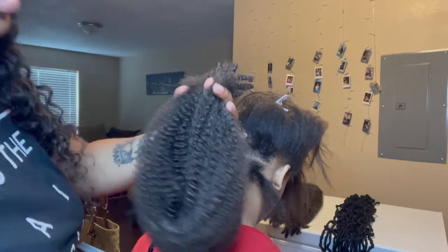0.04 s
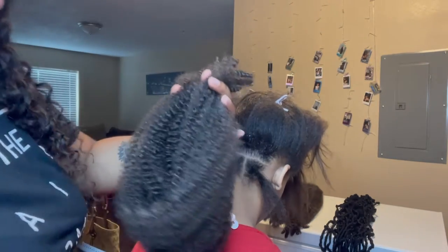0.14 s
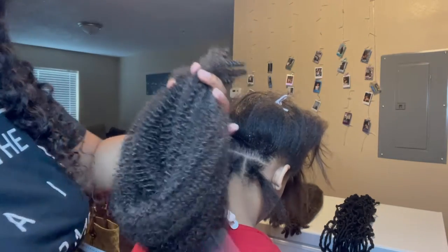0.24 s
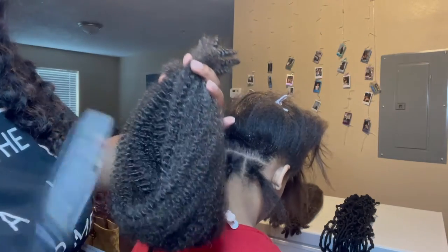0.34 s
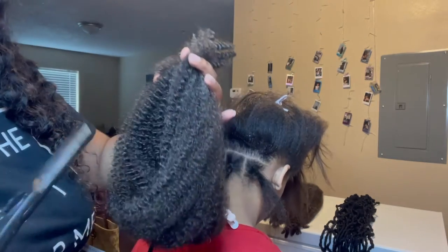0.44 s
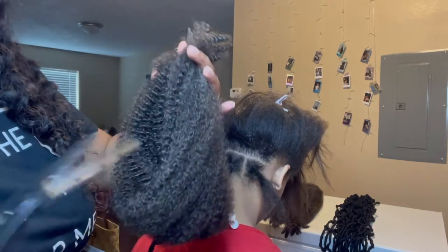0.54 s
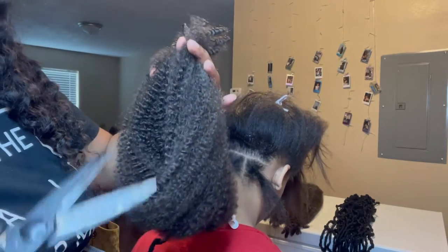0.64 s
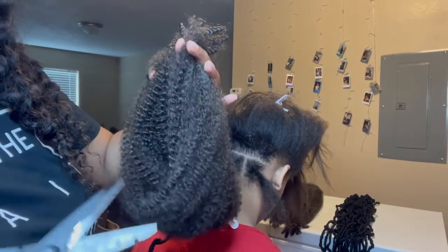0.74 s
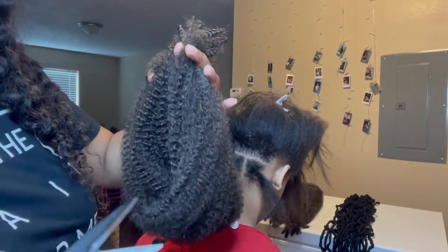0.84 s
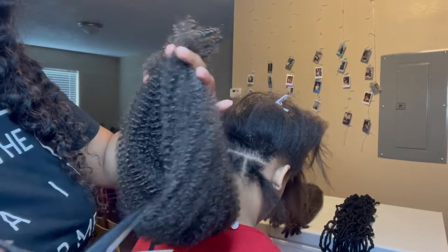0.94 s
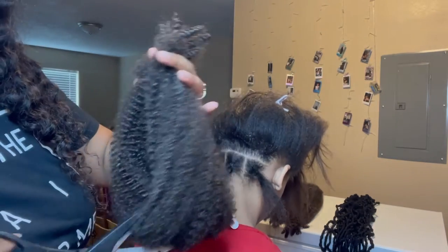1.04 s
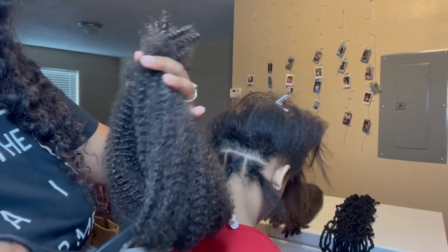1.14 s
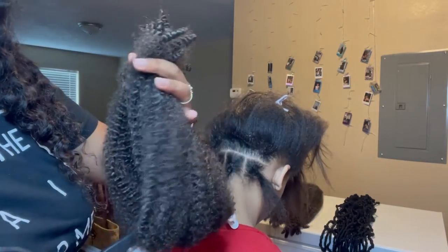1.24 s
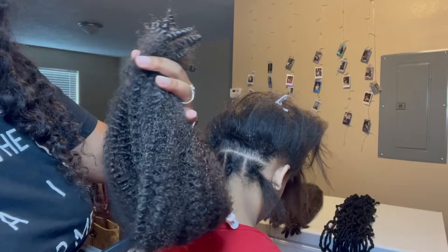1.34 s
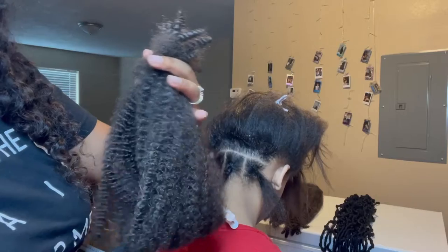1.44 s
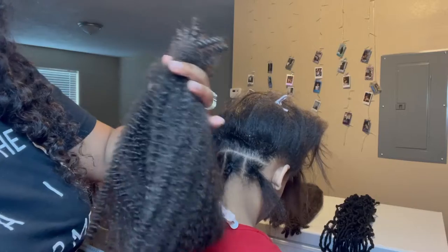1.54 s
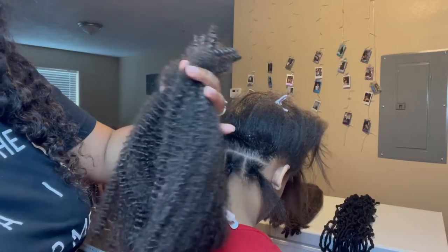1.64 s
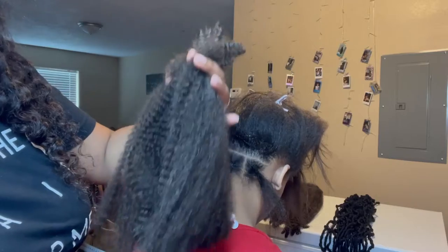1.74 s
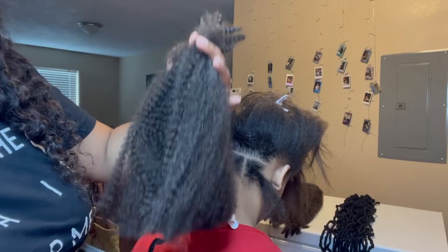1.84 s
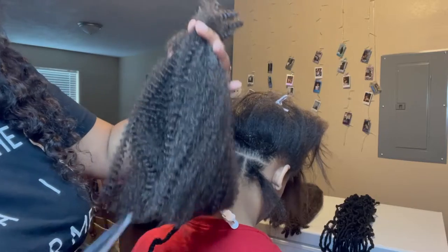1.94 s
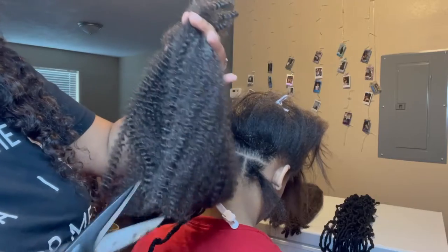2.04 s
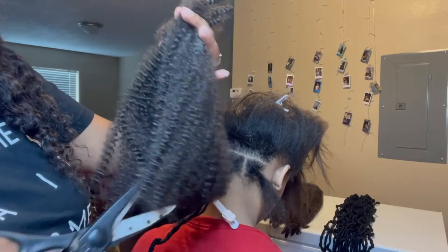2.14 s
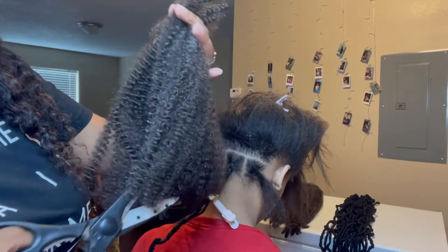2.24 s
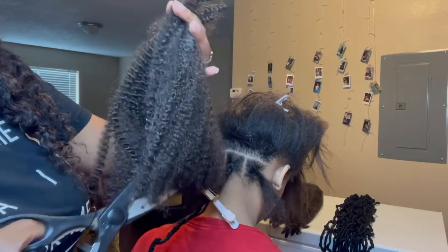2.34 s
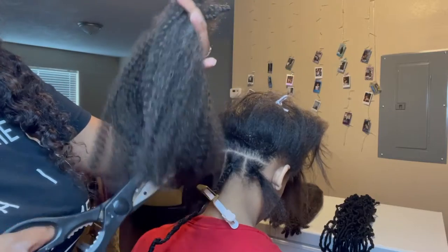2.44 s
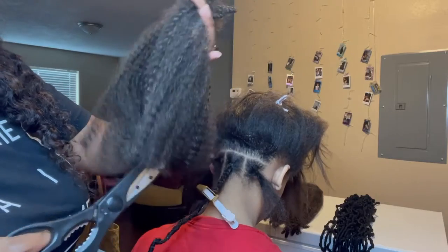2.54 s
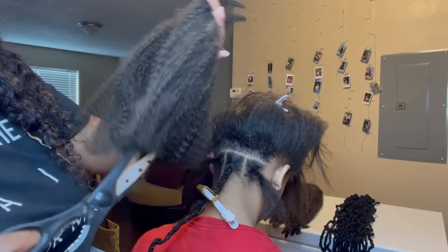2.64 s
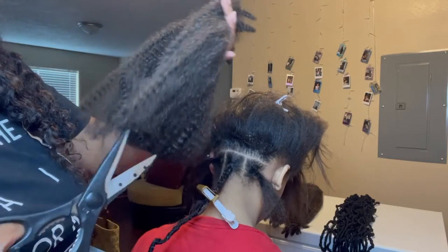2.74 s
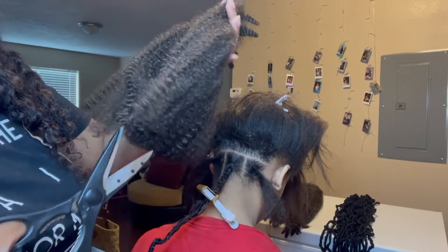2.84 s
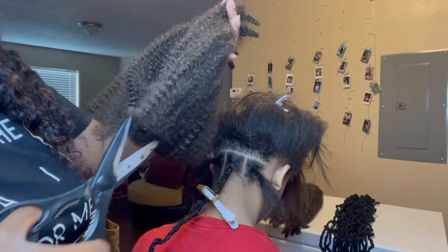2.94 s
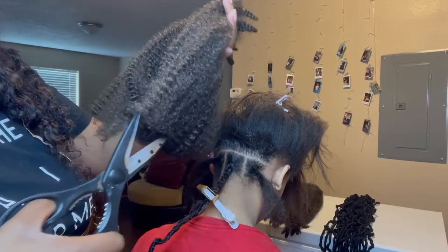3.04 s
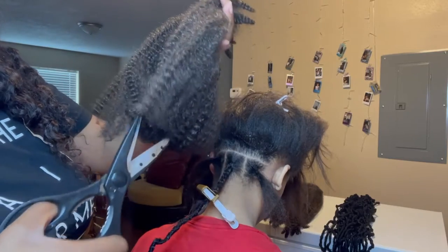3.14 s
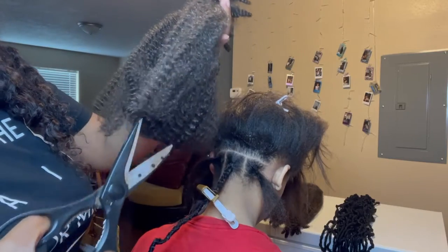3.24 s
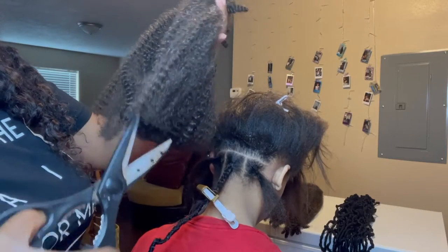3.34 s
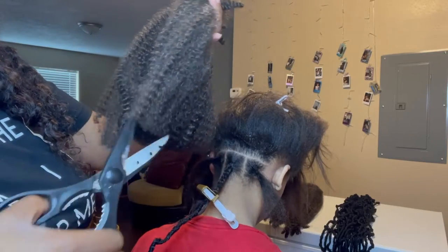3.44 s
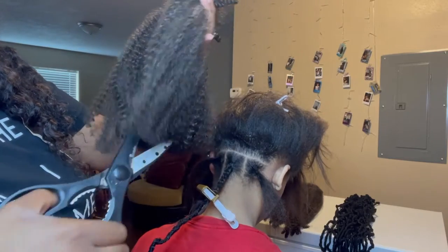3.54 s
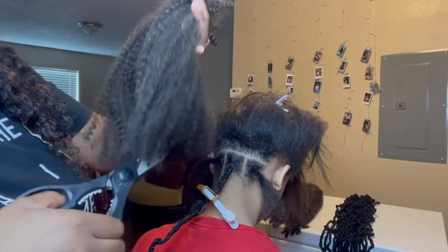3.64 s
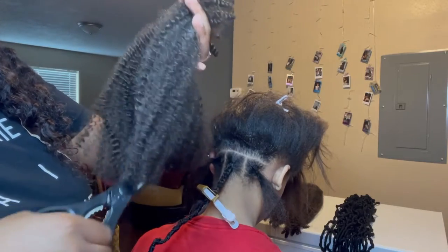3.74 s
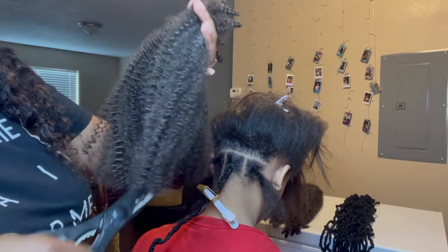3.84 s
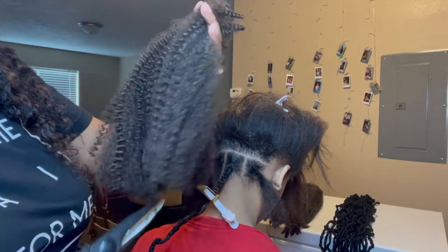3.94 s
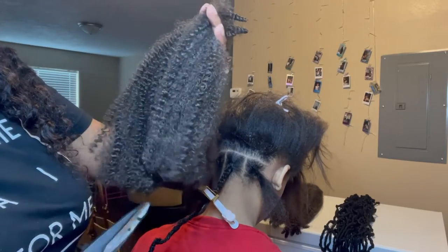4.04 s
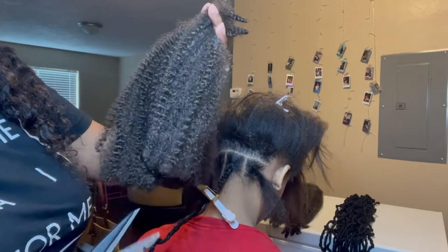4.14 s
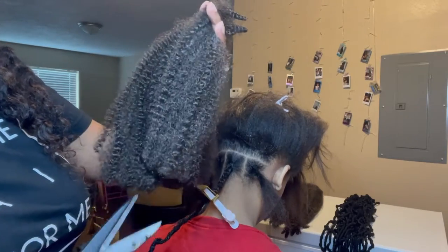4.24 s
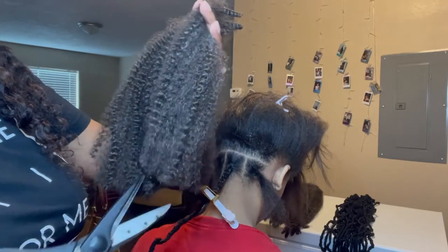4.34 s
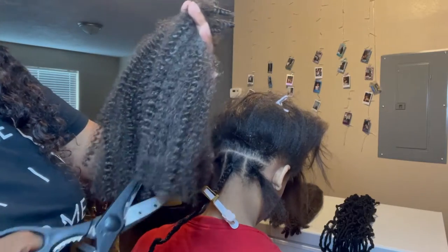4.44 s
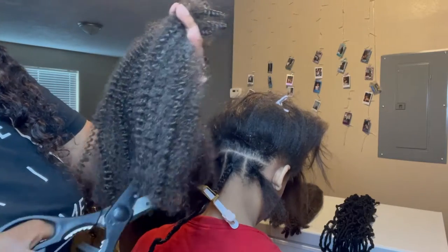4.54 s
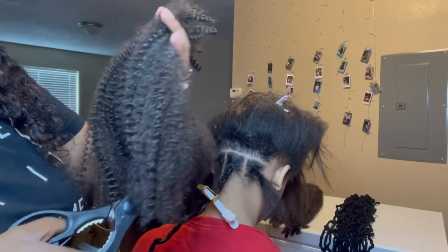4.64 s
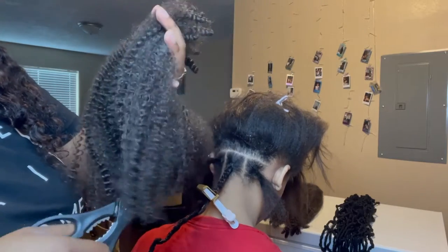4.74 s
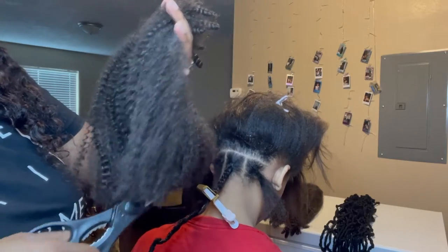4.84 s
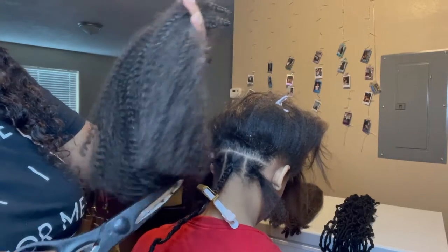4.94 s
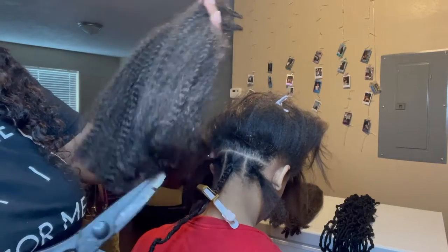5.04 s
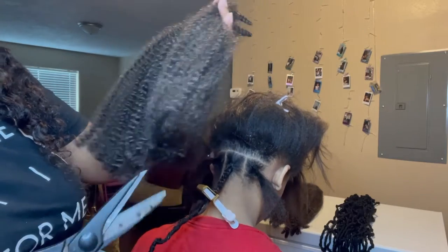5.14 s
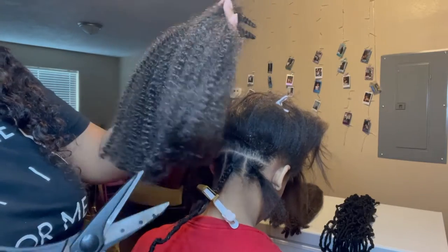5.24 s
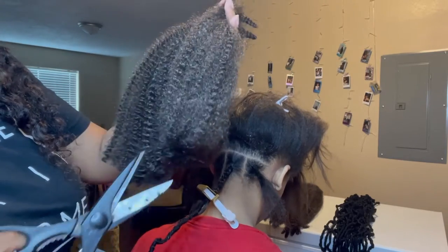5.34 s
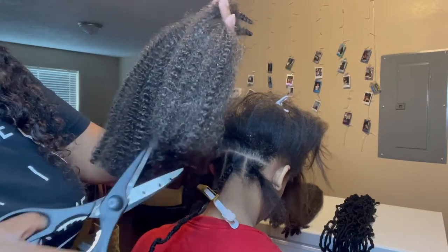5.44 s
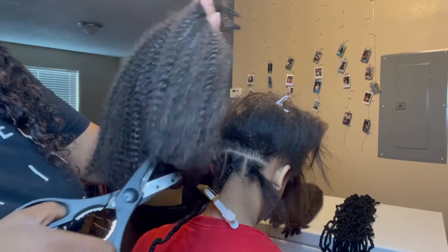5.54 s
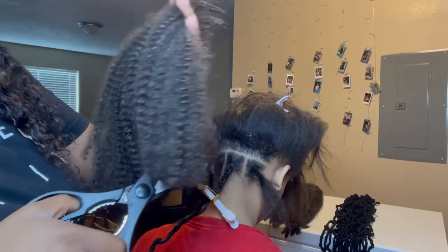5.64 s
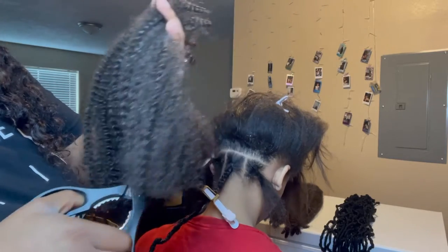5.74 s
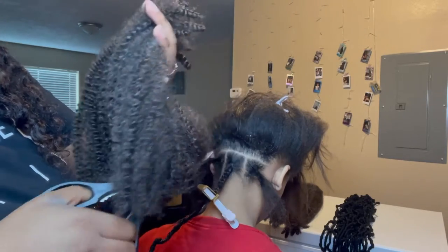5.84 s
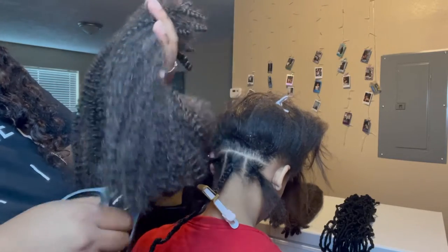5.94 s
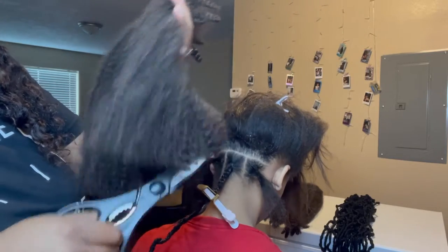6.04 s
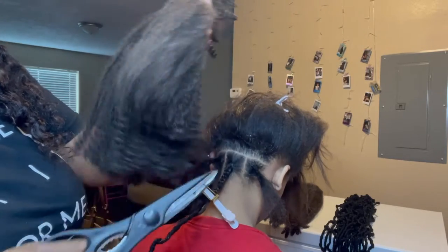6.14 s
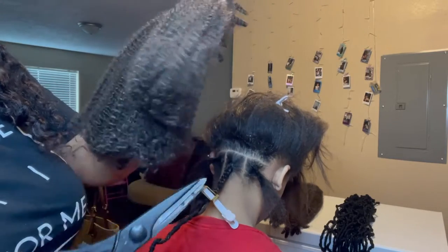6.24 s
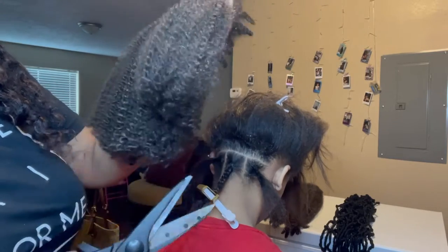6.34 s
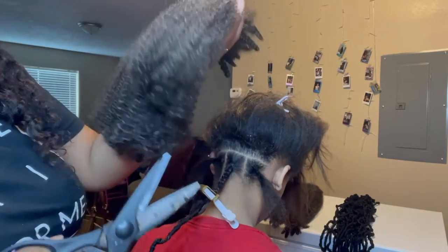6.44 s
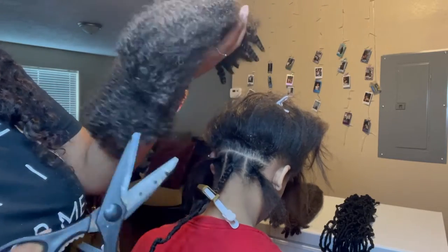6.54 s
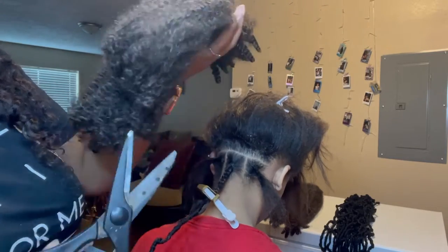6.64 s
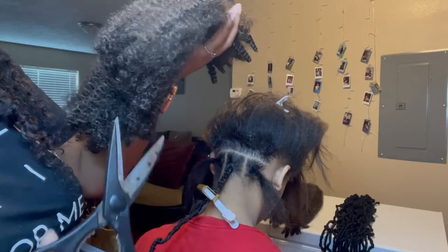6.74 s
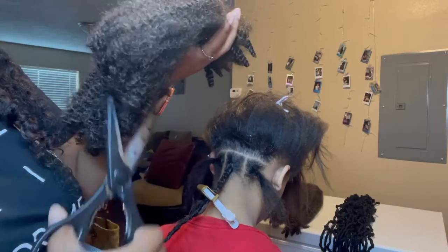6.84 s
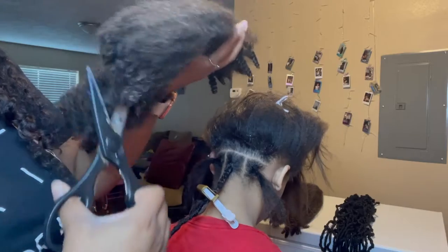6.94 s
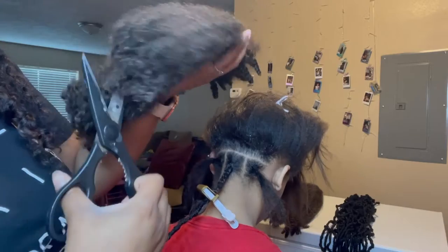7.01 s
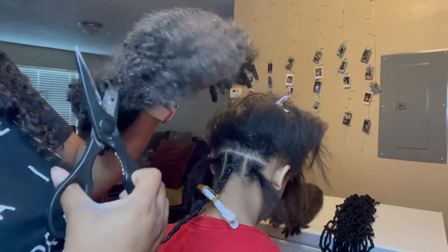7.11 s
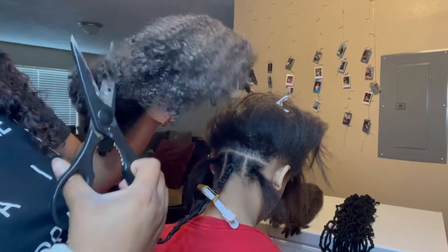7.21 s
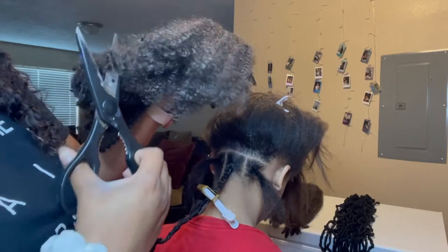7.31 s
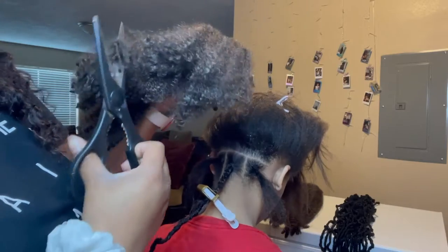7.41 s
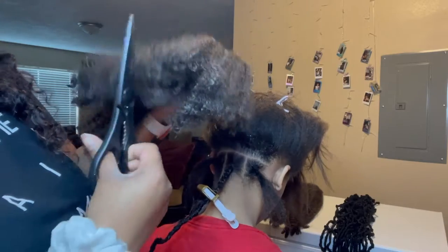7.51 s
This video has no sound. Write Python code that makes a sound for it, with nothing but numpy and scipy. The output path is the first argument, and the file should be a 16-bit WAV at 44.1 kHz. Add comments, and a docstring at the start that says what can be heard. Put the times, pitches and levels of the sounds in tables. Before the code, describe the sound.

Large scissors crunch through a thick bundle of synthetic hair in five slow, sharp metallic snips, close up in a small room with faint low hum.

```python
"""Big scissors cut five times through a bundle of synthetic hair in a small room, close to a two-port microphone.
Each cut: fibre snaps crunch, noise and ringing steel modes make the blades shear through and clack shut.
Before and between cuts the blades rasp open on stick-slip pulses; dry ticks and soft noise rustles are scattered around.
Behind them: a wavering low hum, a thin whine of sines, still air, and a dull noise rumble that comes and goes."""
import sys
import numpy as np
from scipy import signal
from scipy.fft import rfft, irfft, next_fast_len
from scipy.io import wavfile
from scipy.ndimage import uniform_filter1d, map_coordinates

SR = 44100
rng = np.random.default_rng(int(sys.argv[2]) if len(sys.argv) > 2 else 0)


def to_wav(sig):
    """Store sig (one row per channel, or 1-D mono) as 16-bit WAV at the path in sys.argv[1].

    Samples outside -1..1 are clipped; the rate is SR.
    """
    pcm = np.clip(np.atleast_2d(sig), -1, 1) * 32767
    pcm = np.round(pcm).astype(np.int16)
    wavfile.write(sys.argv[1], SR, pcm.T)  # frames by channels


N = 333837
TIME = np.arange(N) / SR
PORT_LAG_S = 7.5 / SR  # a near source reaches the right port this much later

# blades clack shut, relative levels:
# [t/s, clack/dB, final shear/dB, handle ring/dB, handle knock/dB, left minus right/dB]
CLACKS = [(1.5304, -13.5, -29.5, -25, -28.5, -0.5), (3.8733, -14, -25, -26.5, -26.5, -1),
          (4.8650, -9.5, -24, -20.5, -22, -0.5), (6.0151, -10.5, -20.5, -22, -26.5, 0.5),
          (7.4583, -14, -30.5, -48, -32, 1.5)]


def fibres():
    """The closing blades squeeze the bundle: a fine uneven crunch, with a gritty burst as each lock gives way."""
    # thick locks of fibres give way: [t/s, relative level/dB, half length/s, gritty pitch/Hz]
    locks = [(1.305, -43, .004, 11910), (1.312, -40.5, 0.0068, 6180), (1.341, -42, .003, 5670),
             (1.376, -52, .01, 5990), (1.486, -35, 0.0024, 5660), (1.5187, -27, .0025, 10730),
             (3.744, -37, .0035, 6580), (3.805, -43, .004, 6300), (3.8576, -29, .004, 6980),
             (4.69, -46, .0035, 11050), (4.721, -40.5, .004, 6800), (4.743, -41, 0.0032, 6300),
             (4.78, -45, .002, 10980), (5.865, -53, .002, 11220), (5.888, -46.5, .0035, 11540),
             (5.935, -42, 0.0047, 6400), (6.004, -39.5, 0.0044, 3967), (7.4527, -31.5, .003, 4500)]
    # fibre crunch spectrum: [f/Hz, relative level/dB]
    fibre_tone = [(150, -27.5), (450, -6), (1150, -21), (1800, -9.5), (2600, -6), (3800, -7.5),
                  (5000, -15.5), (6500, -1.5), (8500, -9.5), (10500, -2), (13000, -3.5), (16000, -13.5)]
    squeeze = pressure() * amp(-3.5 + 2.3 * wobble(110))
    bursts = amp(-8.5) * swells([row[:3] for row in locks])
    snaps = ports(lambda: crackle(rate=1700, spread_db=4.5), alike=0.71)
    crunch = coloured(snaps * (squeeze + bursts), fibre_tone)
    grit = ports(hiss, alike=0.94)
    for s, db, half_s, hz in locks:
        near = window(s, 4 * half_s, 4 * half_s)
        b, a = signal.iirpeak(hz, 5, SR)
        ringing = unit(signal.lfilter(b, a, grit[:, near]))
        bell = np.exp(-.5 * ((TIME[near] - s) / half_s) ** 2)
        crunch[:, near] += amp(db - 5.5) * bell * ringing
    return patchy(crunch, depth_db=4.5)


def pressure():
    """How hard the bundle is squeezed: it builds from the first touch, holds and lets go."""
    # squeezes by the hand or between the blades:
    # [first touch t/s, rise to full pressure/s, hold/s, relative level/dB]
    squeezes = [(0.0, .005, 0.095, -70), (0.104, 0.026, .008, -58.5), (0.223, .02, 0.096, -77.5),
                (1.19, 0.1, .025, -51), (3.642, .1, .025, -47), (4.663, .05, .135, -45),
                (5.846, 0.072, .012, -42), (7.375, 0.062, 0.0093, -46.5)]
    grip_power, let_go_db_per_s = 0.96, 480
    total = np.zeros(N)
    for s, rise_s, hold_s, db in squeezes:
        build = np.clip((TIME - s) / rise_s, 0, 1) ** grip_power
        total += amp(db) * build * envelope(s + rise_s, hold_s, 0, let_go_db_per_s)
    return total


def patchy(x, depth_db):
    """The point of contact keeps shifting, so the colour changes from moment to moment."""
    z = signal.stft(x, nperseg=256)[2]
    field = rng.standard_normal(z.shape[1:])
    field = uniform_filter1d(field, size=6, axis=0)  # smooth over frequency
    field = uniform_filter1d(field, size=7, axis=1)  # smooth over time
    gain = amp(depth_db * unit(field) - depth_db / 2)
    return signal.istft(z * gain, nperseg=256)[1][:, :N]


def clacks():
    """The blades speed through the last fibres and hit their stop; steel pings and the plastic handles knock."""
    # clack spectrum: [f/Hz, relative level/dB]
    clack_tone = [(100, -42.5), (350, -27), (750, -16), (1000, -15.5), (1400, -17.5), (2000, -12),
                  (2700, -10.5), (4000, -8.5), (5200, -11), (6600, -4.5), (8300, -5), (10000, -7),
                  (13000, -11), (16000, -16.5)]
    # handle knock spectrum: [f/Hz, relative level/dB]
    knock_tone = [(100, -32), (250, -19.5), (420, -6.5), (770, -9), (1000, 1), (1250, -4), (1600, -2),
                  (2100, -6), (3000, -17.5), (16000, -48)]
    # steel blade modes: [f/Hz, relative level/dB, t60/s]
    blade_modes = [(2367, -7, 0.16), (5134, -6.5, .14), (6350, -2.5, .09), (6970, 0, 0.13),
                   (7430, -1, 0.14), (7500, -2, 0.19), (8630, -2.5, 0.083), (8470, -4, 0.031),
                   (10360, -4.5, 0.37)]
    mode_scatter_db = 2.5
    chatter = ports(lambda: np.sign(hiss()), alike=0.97)
    body = ports(lambda: crackle(rate=12000, spread_db=5.0), alike=0.69)
    rattle, stops, knocks, steel = np.zeros((4, 2, N))
    for s, db, shear_db, ring_db, knock_db, pan_db in CLACKS:
        near, hit = window(s, .04, .15), round(s * SR)
        t = TIME[near] - s
        pan = amp([pan_db / 2, -pan_db / 2])
        shear = amp(shear_db) * dying(-t, t60=0.032)  # time reversed: grows up to the stop
        ring = amp(ring_db) * dying(t, t60=0.059)
        clack = amp(db) * dying(t, t60=0.012) * chatter[:, near]
        rattle[:, near] += pan[:, None] * (clack + (shear + ring) * body[:, near])
        stops[:, hit] = pan * amp(db + 9.5)
        knocks[:, hit] = pan * amp(knock_db + 16)
        for hz, mode_db, t60 in blade_modes:
            level = amp(db - 27 + mode_db + rng.normal(0, mode_scatter_db))
            ping = np.sin(2 * np.pi * (hz * t + rng.random((2, 1))))
            steel[:, near] += level * dying(t, t60) * ping

    def sweep(hz):
        # bending waves run faster at high pitch: the blow arrives as a very short downward sweep
        bending = -1j * 0.6033 * np.sqrt(hz)
        lag = 1j * np.pi * hz * PORT_LAG_S * np.array([[1], [-1]])
        return np.exp(bending + lag)

    blows = filtered(coloured(stops, clack_tone) + coloured(knocks, knock_tone), sweep)
    return blows + coloured(rattle, clack_tone) + steel


def rasps():
    """Steel sticks and slips on steel as the blades part: a short jerk, then a rough, half-pitched scrape."""
    # blades jerk free and scrape open: [t/s, jerk relative level/dB, scrape relative level/dB, slip rate/Hz]
    openings = [(.469, -40.5, -56, 2640), (.478, -40.5, -52.5, 2610), (1.706, -43, -52.5, 2815),
                (2.623, -68, -76, 3150), (2.665, -77, -73.5, 3110), (4.059, -44, -54.5, 2710),
                (5.059, -47.5, -55, 2900), (6.243, -53, -53.5, 2833)]
    # rasp spectrum: [f/Hz, relative level/dB]
    rasp_tone = [(200, -31), (1400, -12), (2100, -3.5), (3000, 0.5), (4200, -5.5), (6400, 0.5),
                 (9000, -1.5), (12000, 0.5), (16000, -16.5)]
    jerk_half_s, hold_s = .003, 0.021
    rise_db_per_s, fall_db_per_s = 2500, 380  # starts with the jerk, fades as the blades part
    starts, _, _, slip_hz = np.transpose(openings)
    rate_hz = np.interp(TIME, starts, slip_hz) * np.exp(0.079 * wobble(900))
    turns = np.cumsum(rate_hz) / SR
    slips = unit(sum(np.cos(2 * np.pi * k * turns) for k in range(1, 6)))
    scrape = ports(lambda: crackle(rate=7300, spread_db=4), alike=0.2) + amp(-13.5) * slips
    power = swells([(s, jerk_db, jerk_half_s) for s, jerk_db, _, _ in openings]) ** 2
    for s, _, scrape_db, _ in openings:
        power += (amp(scrape_db) * envelope(s, hold_s, rise_db_per_s, fall_db_per_s)) ** 2
    return coloured(np.sqrt(power) * scrape, rasp_tone)


def ticks():
    """Single dry ticks close to the microphone: noise that starts at once and dies in milliseconds."""
    # small sharp ticks: [t/s, relative level/dB]
    tick_rows = [(0.747, -42.5), (1.196, -60), (1.3545, -44), (6.525, -56.5), (6.574, -56.5), (6.703, -55)]
    # tick spectrum: [f/Hz, relative level/dB]
    tick_tone = [(500, -30), (2500, 3.5), (5000, -1), (7500, 8.5), (12000, -3), (16000, -0.5)]
    size = np.zeros(N)
    for s, db in tick_rows:
        near = window(s, 0, .05)
        size[near] += amp(db) * dying(TIME[near] - s, t60=0.015)
    return coloured(size * ports(hiss, alike=0.94), tick_tone)


def brushing():
    """Soft rustles of noise as the hand turns the bundle."""
    # bundle brushes the hand and sleeve: [t/s, relative level/dB, half length/s]
    brushes = [(.04, -70, 0.047), (.13, -70, 0.021), (.31, -81, 0.046), (1.96, -83.5, 0.046),
               (6.49, -76.5, 0.011), (6.76, -83, 0.081), (7.05, -89, 0.093)]
    # rustle spectrum: [f/Hz, relative level/dB]
    brush_tone = [(300, -4), (700, -4), (1300, -4.5), (2000, 0), (3000, -1), (4000, -1), (6500, -6),
                  (12000, -33), (16000, -40)]
    return swells(brushes) * amp(1.8 * wobble(60)) * diffuse(brush_tone)


def room(x):
    """The walls answer with decaying noise after 1-2 ms; the scissors move, so each cut meets other reflections."""
    # reverberation: [f/Hz, t60/s]
    room_t60 = [(200, 0.27), (1000, 0.46), (3000, 0.39), (7000, .43), (11000, 0.33), (16000, .2)]
    # reverberation spectrum: [f/Hz, relative level/dB]
    room_tone = [(200, 5.5), (1000, 0), (3000, 0), (7000, 0), (9000, -8), (12500, 2), (14500, -12.5)]
    out = np.zeros((2, N + SR))
    edges = [0] + [round((row[0] + .5) * SR) for row in CLACKS[:-1]] + [N]
    for start, end in zip(edges, edges[1:]):
        hz, t, z = signal.stft(rng.standard_normal((2, SR // 2)), SR, nperseg=256)
        fade = amp(along(room_tone, hz)[:, None] - 60 * t / along(room_t60, hz)[:, None])
        near_walls = 1 + 0.92 * np.exp(-t / 0.01)
        tail = signal.istft(z * fade * near_walls, SR, nperseg=256)[1]
        tail *= np.clip(np.arange(tail.shape[1]) / SR / 0.0012 - 1, 0, 1)  # silent for 1.2 ms, then fades in
        answer = signal.fftconvolve(x[:, start:end], tail / np.linalg.norm(tail[0]), axes=1)
        out[:, start:start + answer.shape[1]] += answer
    return out[:, :N]


def hum():
    """A low hum whose strength and phase waver at random."""
    # slow drift of the hum: [t/s, level/dB]
    hum_drift = [(0, -63.5), (.9, -60.5), (2.1, -63), (2.7, -55.5), (3.7, -56.5), (4.5, -54.5),
                 (5.0, -51.5), (5.65, -63), (6.35, -52.5), (6.65, -58.5), (7.57, -58.5)]
    hum_hz, knots_per_s, depth = 59.4, 12, 0.43
    waver = 1 + depth * (wobble(knots_per_s) + 1j * wobble(knots_per_s))
    tone = unit(np.real(waver * np.exp(2j * np.pi * hum_hz * TIME)))
    port_gains = amp([[-.9], [.2]])
    return amp(np.interp(TIME, *np.transpose(hum_drift))) * tone * port_gains


def whine():
    """A thin whine: long sines whose level and phase waver slightly."""
    # whine partials: [f/Hz, rms level before wavering/dB]
    tones = [(533, -81), (775, -96), (1147, -99), (1900, -98), (2433, -100)]
    total = np.zeros((2, N))
    for hz, db in tones:
        level = amp(db + 1.4 * wobble(6)) * np.sqrt(2)
        turns = hz * TIME + rng.random((2, 1)) / 4
        total += level * np.sin(2 * np.pi * turns + 0.36 * wobble(3.8))
    return total


def rumble():
    """A dull, lumpy noise rumble that swells quickly and sinks back to rest."""
    # rumble swells: [t/s at the top, relative level/dB, dying away/(dB/s)]
    surges = [(.7, -70.5, 35), (1.95, -65.5, 55), (3.0, -71.5, 25), (3.92, -69.5, 20.5), (5.05, -64.5, 57),
              (6.2, -69.5, 52), (6.65, -74, 8), (7.08, -70.5, 58)]
    # rumble spectrum: [f/Hz, relative level/dB]
    rumble_tone = [(70, -12), (130, 0), (200, -6.5), (280, -3.5), (350, 4), (420, -10), (520, -17.5),
                   (900, -25.5), (2000, -23.5), (5000, -53.5)]
    rise_db_per_s, relative_rest_db = 65.5, -85.5
    power = amp(relative_rest_db) ** 2
    for s, db, fall_db_per_s in surges:
        power = power + (amp(db) * envelope(s, 0, rise_db_per_s, fall_db_per_s)) ** 2
    return np.sqrt(power) * amp(3.5 + 2.2 * wobble(14)) * diffuse(rumble_tone)


def background():
    """The hum, the whine, the rumble and still air as faint noise."""
    # air noise spectrum: [f/Hz, relative level/dB]
    air_tone = [(20, -4), (45, 8), (100, 3.5), (170, -7.5), (400, -9.5), (700, -17.5), (1300, -25.5),
                (2100, -25), (3500, -30.5), (5500, -30), (8000, -35.5), (12500, -35.5), (14500, -49),
                (16000, -48)]
    return hum() + whine() + rumble() + amp(-67) * diffuse(air_tone)


def diffuse(spectrum):
    """Room noise of rms 1, most alike at the two ports in the bass."""
    # left-right likeness of diffuse noise: [f/Hz, correlation]
    likeness = [(60, 0.68), (130, 0.86), (300, 0.35), (700, -0.27), (1400, 0.29), (8000, -0.27)]

    def mid_side(hz):
        turn = np.arccos(np.clip(along(likeness, hz), -1, 1)) / 2
        return amp(along(spectrum, hz)) * [np.cos(turn), np.sin(turn)]

    mid, side = filtered(np.array([hiss(), hiss()]), mid_side)
    return unit(np.array([mid + side, mid - side]))


def ports(draw, alike):
    """A near source: a shared part that reaches the left port first, and a part scattered to each port."""
    alike = np.clip(alike, 0, 1)
    shared = draw()
    taps = np.arange(16)
    delay = np.sinc(taps - PORT_LAG_S * SR) * np.hanning(len(taps))
    later = np.convolve(shared, delay)[:N]
    scattered = np.array([draw(), draw()])
    return np.sqrt(alike) * np.array([shared, later]) + np.sqrt(1 - alike) * scattered


def hiss():
    """White noise of rms 1."""
    return rng.standard_normal(N)


def crackle(rate, spread_db):
    """Tiny fibre snaps of uneven size, rate a second, rms 1."""
    chance = rng.random(N) * SR / rate
    hit = chance < 1
    snaps = np.zeros(N)
    sign = np.sign(rng.random(N)[hit] - .5)
    snaps[hit] = sign * amp(-spread_db * np.log(chance[hit] + 0.014))
    return unit(snaps)


def swells(rows):
    """One short bell of level for each row [t/s, level/dB, half length/s], added as power."""
    power = np.zeros(N)
    for s, db, half_s in rows:
        near = window(s, 4 * half_s, 4 * half_s)
        power[near] += amp(db) ** 2 * np.exp(-((TIME[near] - s) / half_s) ** 2)
    return np.sqrt(power)


def dying(t, t60):
    """A gain that jumps to 1 at t = 0 and falls 60 dB in t60."""
    return (t >= 0) * amp(-60 * np.abs(t) / t60)


def envelope(s, hold_s, rise_db_per_s, fall_db_per_s):
    """Gain that climbs to 1 at s, holds, and falls away."""
    rise_db = -rise_db_per_s * np.maximum(s - TIME, 0)
    fall_db = -fall_db_per_s * np.maximum(TIME - s - hold_s, 0)
    return amp(rise_db + fall_db)


def wobble(rate):
    """A smooth random curve, rate knots a second."""
    return map_coordinates(rng.standard_normal(int(N * rate / SR) + 4), [TIME * rate])


def window(s, before, after):
    """The samples around a moment, all in seconds."""
    return slice(max(round((s - before) * SR), 0), round((s + after) * SR))


def filtered(x, response):
    """x times a complex response of frequency."""
    m = next_fast_len(N + SR // 2)
    return irfft(rfft(x, m) * response(np.fft.rfftfreq(m, 1 / SR)), m)[..., :N]


def coloured(x, spectrum, size=2048):
    """A causal (minimum-phase) filter of unit energy with the given spectrum."""
    gain = amp(along(spectrum, np.fft.rfftfreq(size, 1 / SR)))
    cepstrum = irfft(np.log(gain))
    cepstrum[1:size // 2] *= 2
    cepstrum[size // 2 + 1:] = 0
    h = irfft(np.exp(rfft(cepstrum)))
    return signal.oaconvolve(x, h[None] / np.linalg.norm(h), axes=1)[:, :N]


def along(points, hz):
    """Points [f/Hz, value] interpolated on a log frequency axis."""
    f, v = np.transpose(points)
    return np.interp(np.log(hz + 1), np.log(f + 1), v)


def amp(db):
    """Decibels to amplitude."""
    return 10 ** (np.asarray(db) / 20)


def unit(x):
    """x scaled to rms 1."""
    return x / np.sqrt(np.mean(x ** 2) + 1e-20)


def scene():
    """The cuts, their room answer, the small noises and the background."""
    cutting, shutting, opening = fibres(), clacks(), rasps()
    walls = room(amp(-6.5) * cutting + amp(-9.5) * shutting + amp(-12.5) * opening)
    return cutting + shutting + opening + ticks() + brushing() + walls + background()


def record(dry):
    """The recorder cuts off steeply above its band limit."""
    top_hz = 16200  # half amplitude here
    return filtered(dry, lambda hz: 1 / (1 + (hz / top_hz) ** 120))


dry = scene()
out = record(dry)
to_wav(out)
```